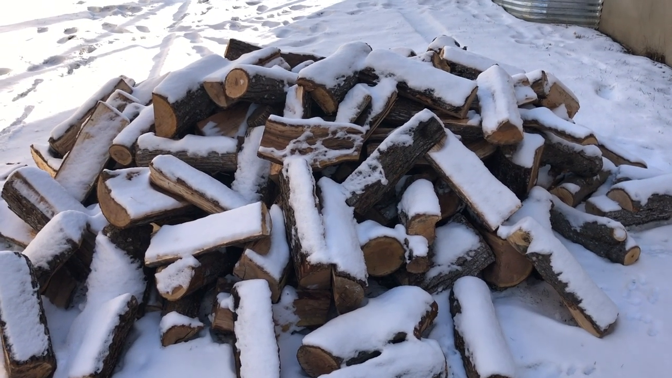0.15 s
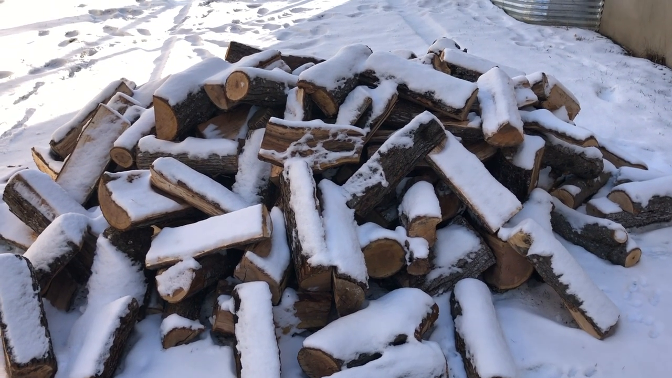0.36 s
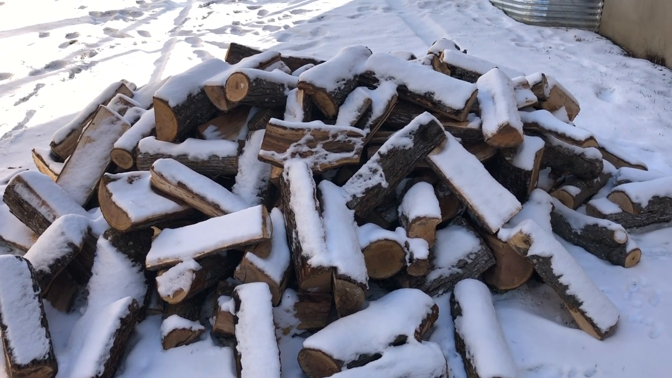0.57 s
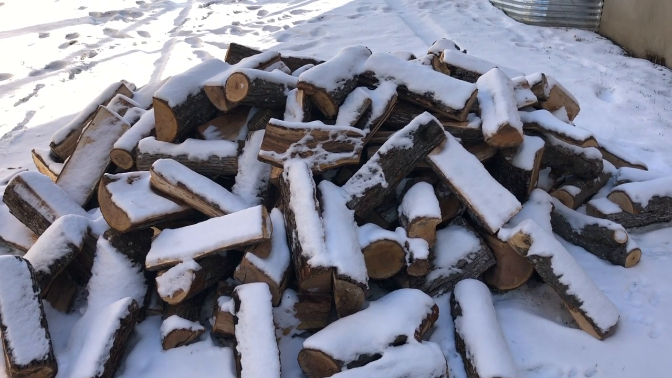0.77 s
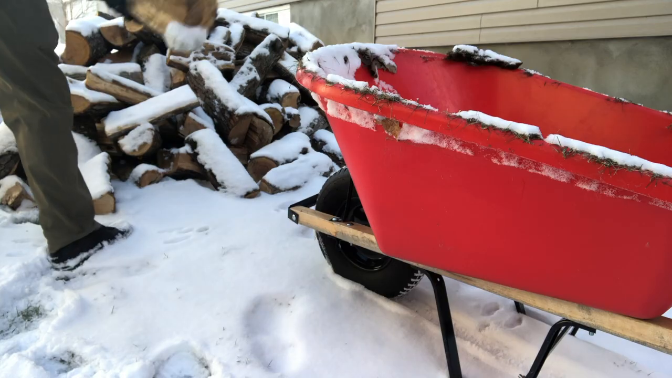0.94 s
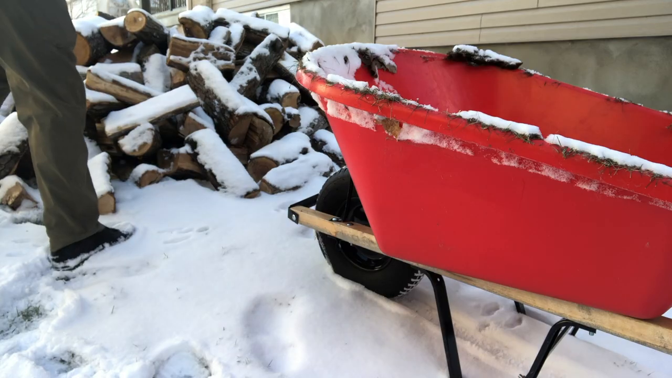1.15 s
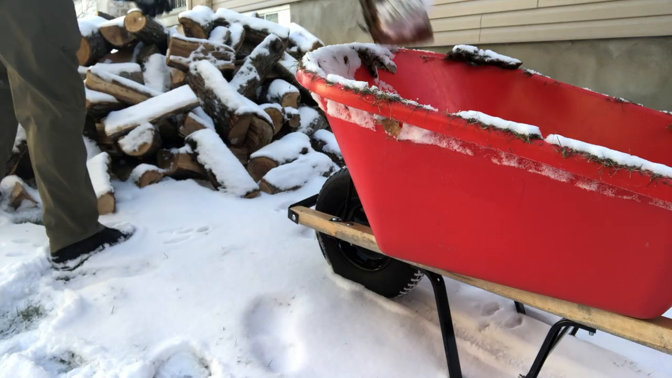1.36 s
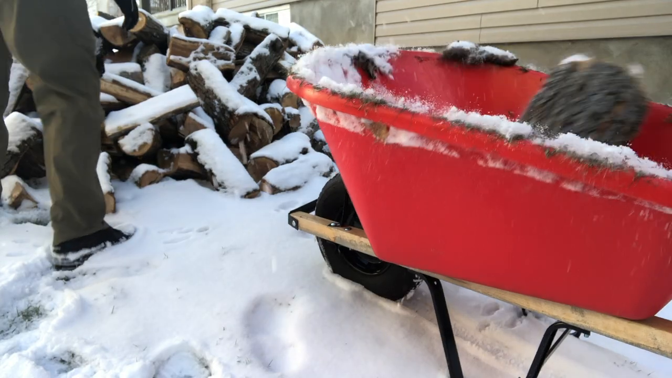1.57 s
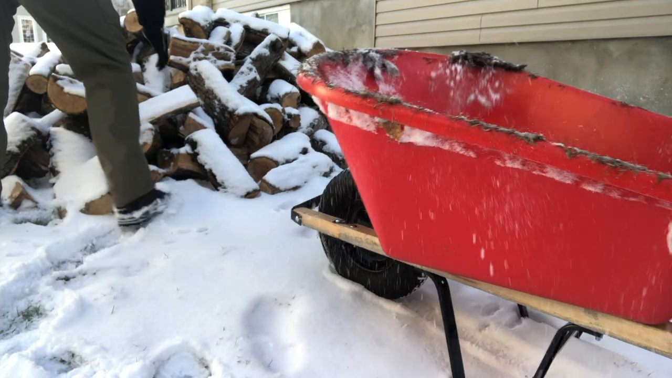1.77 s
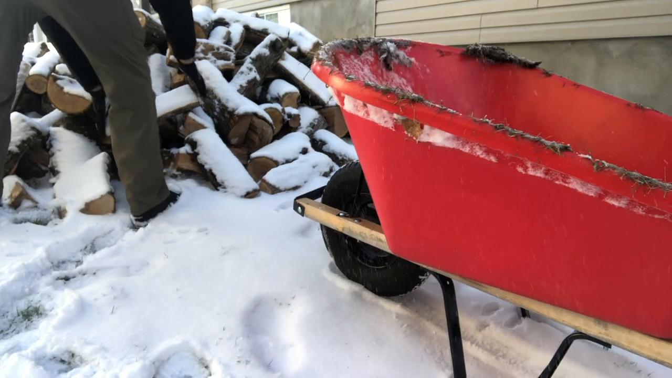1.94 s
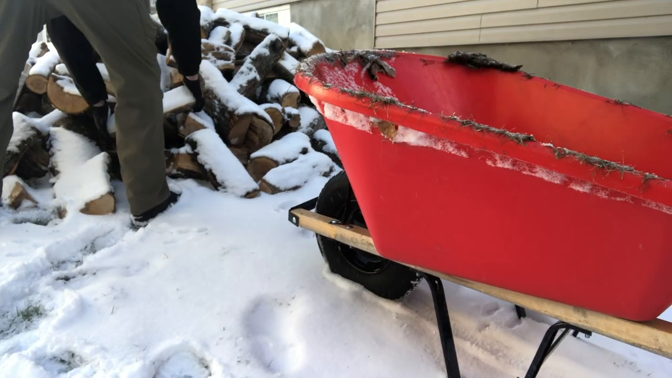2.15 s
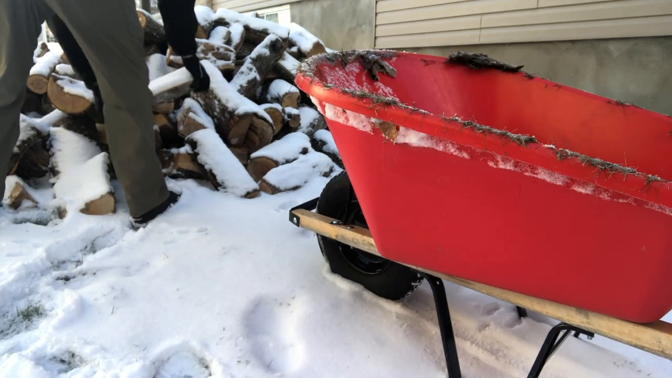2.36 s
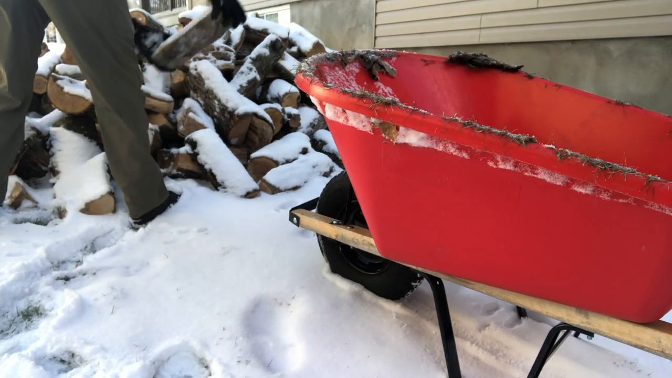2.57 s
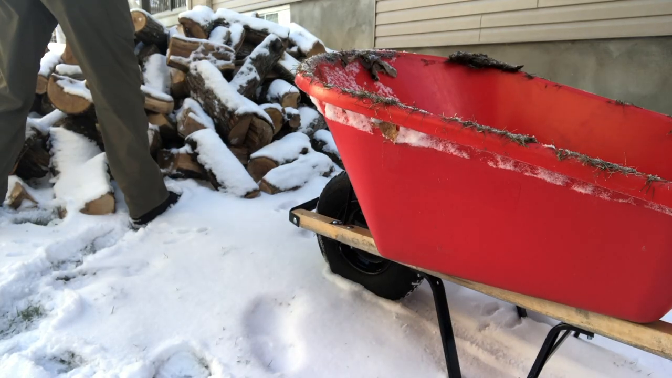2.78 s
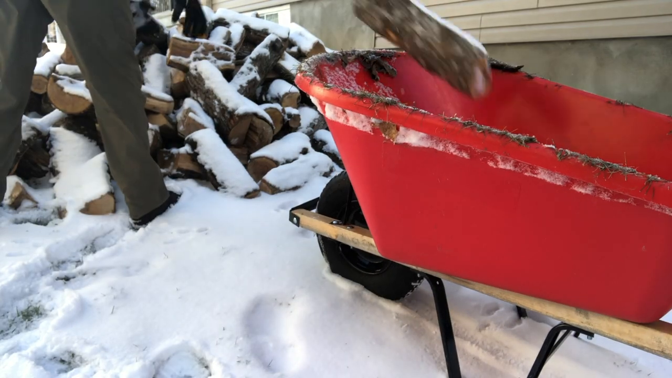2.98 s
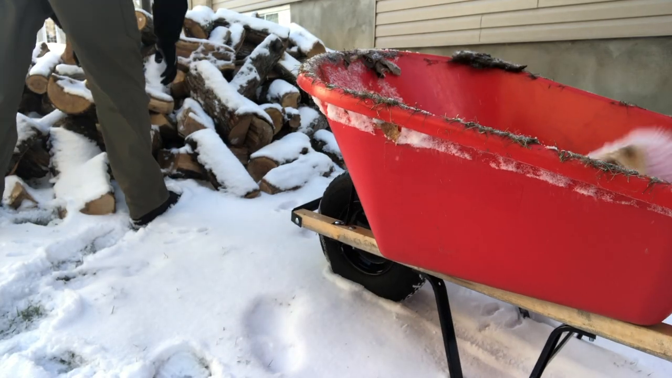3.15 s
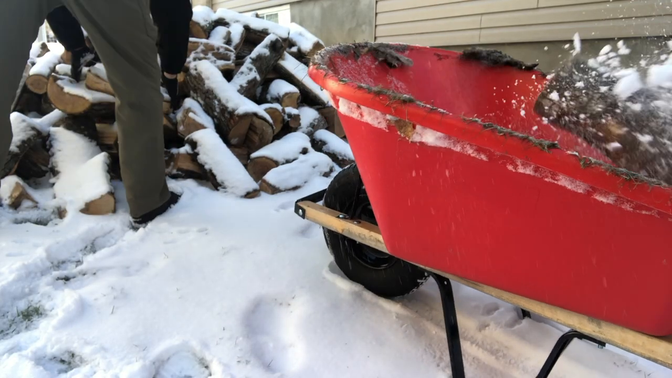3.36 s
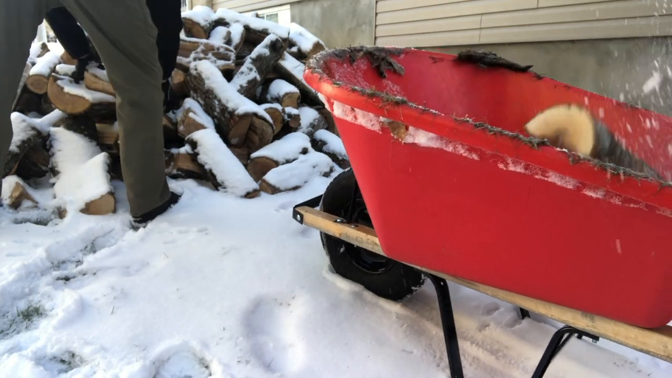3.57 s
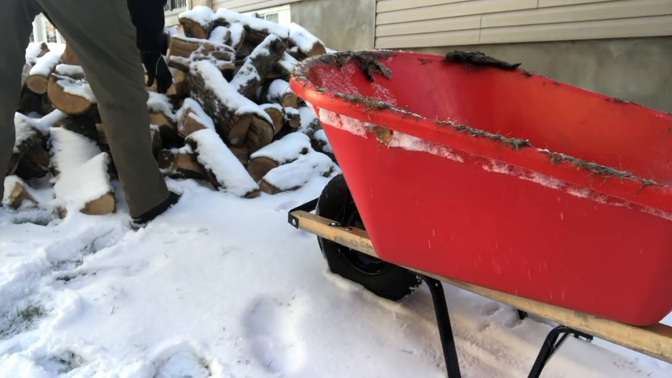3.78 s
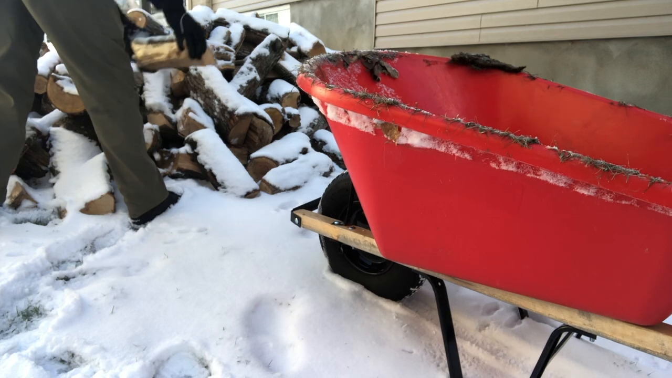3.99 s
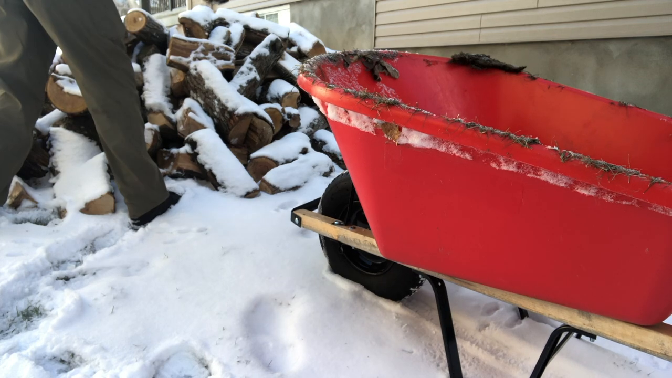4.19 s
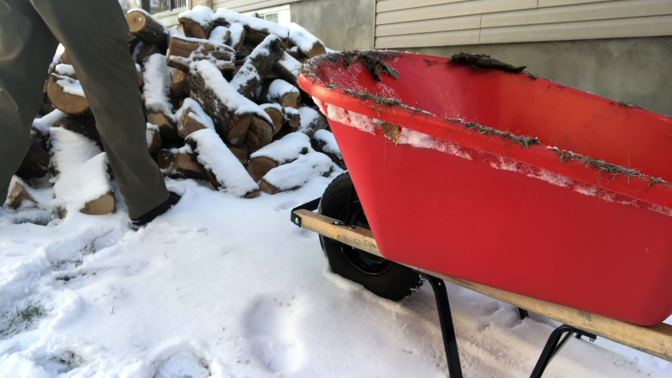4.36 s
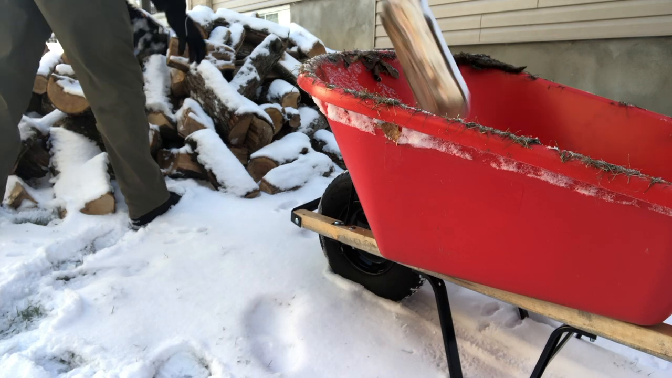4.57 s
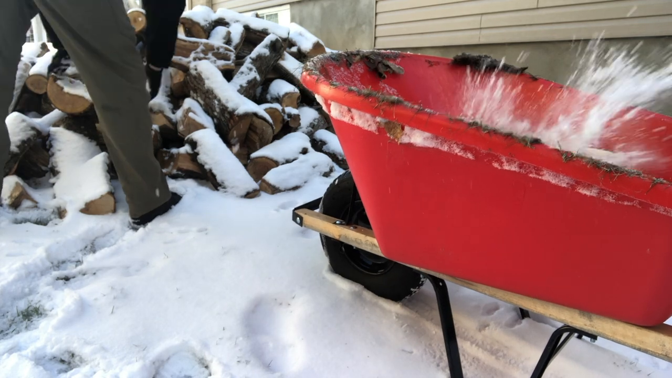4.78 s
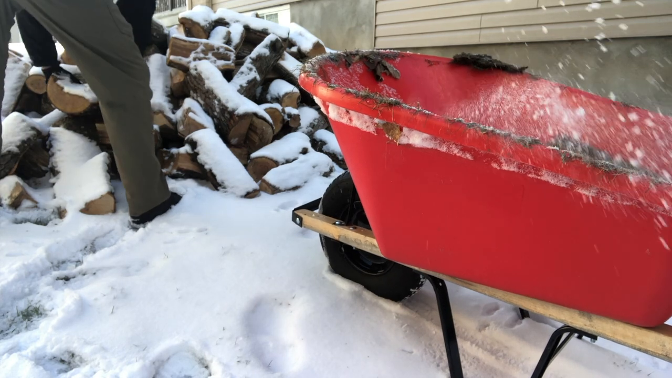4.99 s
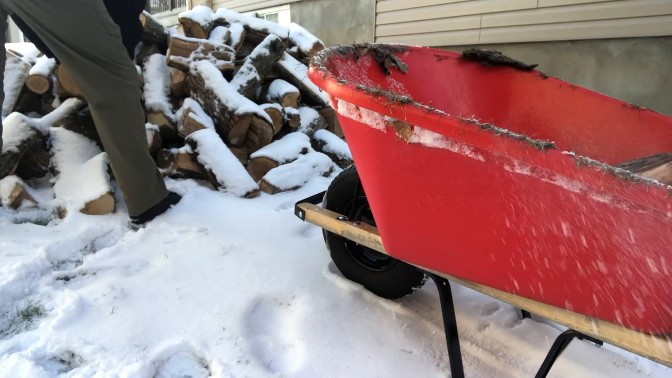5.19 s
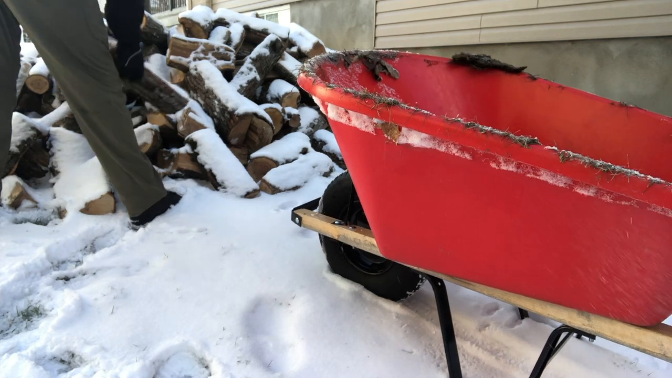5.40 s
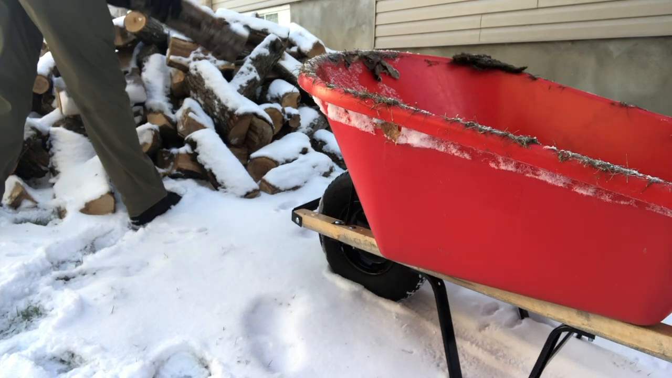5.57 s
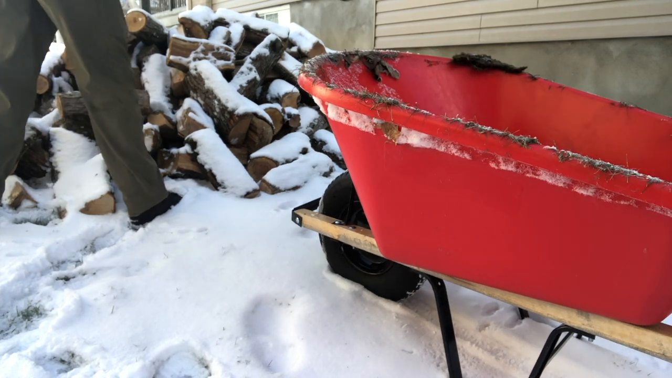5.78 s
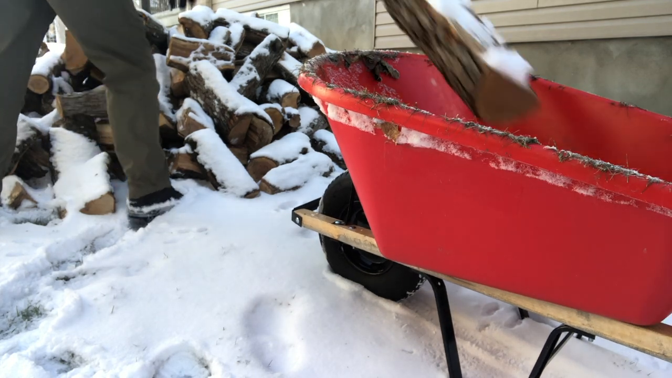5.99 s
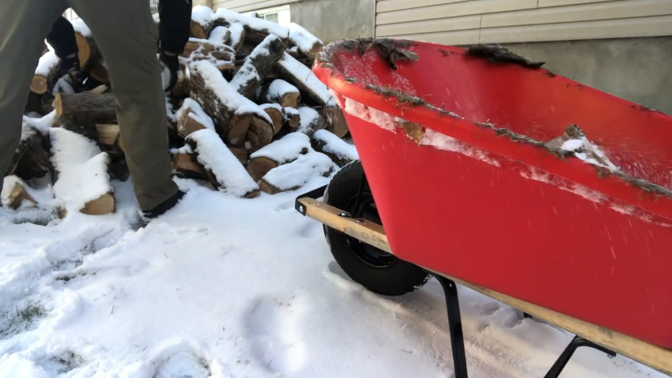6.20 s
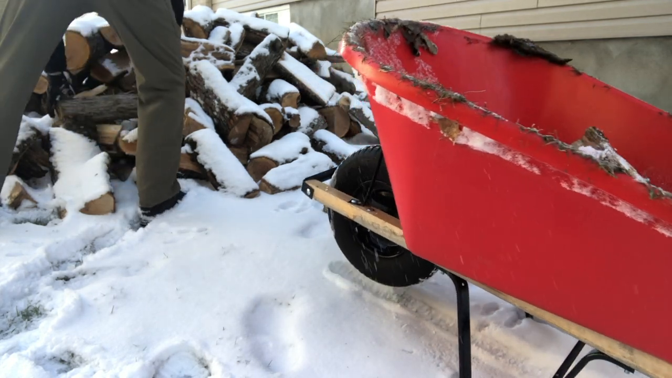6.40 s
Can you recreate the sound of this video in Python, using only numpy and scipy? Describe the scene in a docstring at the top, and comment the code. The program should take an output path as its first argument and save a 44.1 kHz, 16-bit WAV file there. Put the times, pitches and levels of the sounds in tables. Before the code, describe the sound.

In a quiet snowy yard, faint footfalls and a soft rustle lead to a split log slamming into an empty plastic wheelbarrow with a deep hollow boom. It tumbles, and the frame gives a low thump as it settles. Three more logs follow about a second and a half apart, cracking against wood and tub, rolling and knocking. Close microphone, dry, mono.

```python
"""A snowy yard beside a house wall, where four split logs are thrown into a plastic wheelbarrow.
Logs, tub and frame sound by filtered noise bursts and decaying modes: each log lands in a cluster
of blows, tumbles, rolls and knocks against the others while the tub booms. Soft thumps fall in
pitch, a pulled log rustles, crumbs tick down as noise grains, and a faint hiss swells over a hush.
The barrow rocks on its legs, and a limiter holds down the landings."""
import sys
import numpy as np
from scipy import signal
from scipy.fft import rfft, irfft
from scipy.io import wavfile
from scipy.ndimage import uniform_filter1d, minimum_filter1d, map_coordinates

SR = 44100
rng = np.random.default_rng(int(sys.argv[2]) if len(sys.argv) > 2 else 0)


def transcribe(u):
    """Save the signal u as a 16-bit wav file named by the first command-line argument.

    u: samples, shape (n,) or (channels, n), limited to [-1, 1]; the rate is SR.
    q: integer samples, one column per channel.
    """
    v = np.clip(np.atleast_2d(u).T, -1, 1)
    q = np.round(v * 32767).astype(np.int16)
    wavfile.write(sys.argv[1], SR, q)


N = 284004

# spectrum shared by the background hiss and the rustling: (frequency [Hz], relative level [dB])
HISS_SPECTRUM = [(30, -7.5), (100, -8), (280, 6), (450, -7), (750, 4), (1400, -11.5), (2700, -5.5),
                 (3800, -23), (4900, -18), (5050, -9.5), (5200, -24.5), (7000, -24.5), (10000, -37),
                 (15000, -36.5)]
# spectrum of splintering ice and falling crumbs: (frequency [Hz], relative level [dB])
ICE_SPECTRUM = [(3000, -24.5), (4500, -4.5), (6200, 2.5), (8000, -15.5), (10000, -9), (15000, -29)]
# Impacts; each part adds its own gain to the levels:
# (time [s], tub thud [dB], tub boom [dB], wood [dB], edge crack [dB], clatter length [s])
LANDING_IMPACTS = [(1.55, -15, -12.5, -19, -25, 0.05), (3.138, -14, -16, -21.5, -12, .11),
                   (4.683, -12, -25, -21, -40, 0.08), (6.118, -11, -20, -23, -19.5, 0.02)]  # a thrown log lands in the tub
KNOCK_IMPACTS = [(1.562, -6, -18, -25.5, -42, 0.0018), (1.709, -9, -22, -22.5, -46, .002),
                 (1.8163, -26, -22, -21, -20.5, 0.0087), (1.865, -18.5, -25, -28.5, -55, 0.0024),
                 (1.9797, -28.5, -42, -35, -27.5, 0.0018), (2.08, -46, -64, -48, -49, .001),
                 (2.151, -24.5, -32, -35.5, -33, 0.0089), (2.199, -31.5, -46, -45.5, -38, 0.0015),
                 (2.264, -40, -64, -40.5, -43.5, 0.0083), (2.367, -40, -58, -44, -63, 0.0032),
                 (2.498, -44, -57, -48.5, -63, 0.0037), (3.198, -11, -10.5, -17, -18, .002),
                 (3.237, -9, -18, -31, -18.5, .002), (3.258, -16, -24, -31, -45, .008),
                 (3.508, -17.5, -22.5, -28.5, -38, 0.0058), (3.611, -18.5, -17, -31, -34, 0.036),
                 (3.722, -21, -28, -27.5, -44, 0.022), (3.829, -20, -24, -25, -35.5, 0.026),
                 (3.866, -10, -39, -23, -31, 0.0098), (3.987, -34.5, -31, -40.5, -58, .002),
                 (4.042, -40, -37.5, -50.5, -41, 0.045), (4.11, -35.5, -47, -46, -55, 0.011),
                 (4.171, -59, -40.5, -51.5, -55, .002), (4.77, -26, -14.5, -27.5, -22, 0.014),
                 (4.826, -29, -25.5, -32, -42, 0.0015), (5.039, -16, -30, -26.5, -42, .03),
                 (5.085, -31, -46, -31.5, -33.5, .002), (5.16, -29.5, -31.5, -44.5, -57, .002),
                 (5.19, -19, -25, -36, -62, 0.0012), (5.296, -28.5, -41, -41.5, -52, 0.044),
                 (5.336, -21.5, -28, -37.5, -24.5, .004), (5.424, -30, -34, -37, -42, 0.0018),
                 (5.498, -40.5, -38.5, -49, -45, 0.041), (5.651, -41.5, -36.5, -51.5, -87, 0.0026),
                 (5.711, -43, -43, -48, -108, 0.0084), (6.153, -8.5, -30, -17.5, -47, 0.0022),
                 (6.185, -19, -20.5, -24, -21, .025), (6.344, -41, -44, -48, -49, 0.053),
                 (6.434, -43, -63, -35.5, -56, 0.0016)]  # a log tumbles against the tub or other logs


def gain_of(db):
    """Level to amplitude: 20 dB is a factor of ten."""
    return 10 ** (np.asarray(db) / 20)


def evened(x):
    """Normalises the mean power: scales to rms 1."""
    return x / np.sqrt(np.mean(x ** 2) + 1e-20)


def read(points, hz):
    """Interpolates a spectrum linearly in level over log frequency."""
    f, value = np.transpose(points)
    return np.interp(np.log(hz + 1), np.log(f), value)


def add(mix, s, sound):
    """Superposition: sums a sound into the mix at time s [s]."""
    part = mix[max(round(s * SR), 0):][:len(sound)]
    part += sound[:len(part)]


def coloured(points):
    """Spectral shaping: white noise weighted per frequency, then brought to rms 1."""
    spectrum = rfft(rng.standard_normal(N))
    gain = gain_of(read(points, np.fft.rfftfreq(N, 1 / SR)))
    return evened(irfft(spectrum * gain, N))


def response(points, size=4096):
    """Minimum phase: the Hilbert transform of log gain gives a causal impulse response of energy 1."""
    log_gain = np.log(gain_of(read(points, abs(np.fft.fftfreq(size, 1 / SR)))))
    minimum_phase = np.exp(np.conj(signal.hilbert(log_gain)))
    taps = np.fft.ifft(minimum_phase).real[:size // 2]
    return taps / np.linalg.norm(taps)


def background():
    """Amplitude-modulated noise: a steady coloured hush under a hiss that swells a little."""
    # the constant hush: (frequency [Hz], relative level [dB])
    hush_spectrum = [(25, -4.5), (70, -3.5), (150, -11.5), (330, -13.5), (750, -12.5), (1500, -23),
                     (2500, -33), (5000, -34), (10000, -40), (15000, -39.5)]
    hush_db, hiss_db, swell_db = -69.5, -70, 1.2
    hiss_start_s, hiss_rise_s = 0.82, 0.026
    t = np.arange(N) / SR
    rates_hz = np.geomspace(.5, 14, 20)
    swell = evened(sum(np.sin(2 * np.pi * (f * t + rng.random())) / np.sqrt(f) for f in rates_hz))
    # soft handling rustle makes the hiss 5 dB louder at first
    level_db = hiss_db + np.interp(t, (1.3, 2.3), [5, 0]) + swell_db * swell
    # the hiss rises from a twentieth to its full amplitude
    opening = np.clip((t - hiss_start_s) / hiss_rise_s, .05, 1)
    hush = gain_of(hush_db) * coloured(hush_spectrum)
    return hush + opening * gain_of(level_db) * coloured(HISS_SPECTRUM)


def ground(count=8):
    """Dispersion: soft thumps fall in pitch, as waves disperse in the frozen ground."""
    # dull thumps on the frozen ground:
    # (time [s], level [dB], starting pitch [Hz], length scale [s])
    ground_thumps = [(0.179, -47.5, 227, 0.069), (0.237, -48, 223, 0.076), (0.332, -52.5, 145, 0.11),
                     (0.502, -49.5, 196, 0.074), (0.532, -46.5, 287, 0.024), (0.547, -44.5, 151, 0.078),
                     (0.661, -52, 280, 0.064), (1.134, -51, 360, 0.038), (1.355, -44.5, 304, 0.038),
                     (2.209, -23, 258, 0.053), (2.519, -39, 252, 0.052), (5.705, -38, 327, 0.06)]
    shuffle_end_s, shuffle_db, shuffle_hz, shuffle_length_s = 0.68, -57.5, 128, 0.15
    final_hz, pitch_fall_s, crunch_gain = 55, 0.0252, 0.29
    out = np.zeros(N)
    # feet shift softly between the first steps
    starts = (np.arange(count) + rng.random(count)) * shuffle_end_s / count
    shuffles = [(s, shuffle_db, shuffle_hz, shuffle_length_s) for s in starts]
    t = np.arange(SR // 4) / SR
    for s, db, hz, length in ground_thumps + shuffles:
        turns = np.cumsum(final_hz + (hz - final_hz) * np.exp(-t / pitch_fall_s)) / SR
        low_pass = signal.butter(2, hz, fs=SR, output="sos")
        crunch = evened(signal.sosfilt(low_pass, rng.standard_normal(len(t))))
        age = t / (0.23 * length)  # the envelope peaks at age 1
        envelope = (age * np.exp(1 - age)) ** 2
        add(out, s, gain_of(db) * envelope * (np.sin(2 * np.pi * turns) + crunch_gain * crunch))
    return out


def rustle():
    """Friction noise: short Gaussian swells of snow and cloth rubbing."""
    # a log is pulled from the snowy pile: (time [s], level [dB])
    pulls = [(.9, -62), (1.075, -61.5), (1.16, -64), (1.225, -69), (1.38, -68)]
    width_s = .025
    t = np.arange(N) / SR
    envelope = sum(gain_of(db) * np.exp(-((t - s) / width_s) ** 2) for s, db in pulls)
    return coloured(HISS_SPECTRUM) * envelope


def struck(blows, colour, db, delay, t60, rise, tail_db, tail_t60, grain, push, size=20000, count=4000):
    """Impulse excitation: a push, a quick scatter of waves, then a grainy rattling tail."""
    t, taps, out = np.arange(size) / SR, response(colour), np.zeros(N)
    dying = gain_of(-60 * t / tail_t60) * (1 - np.exp(-t / t60))
    early = t[:count]
    for s, level_db, soft in blows:
        lumps = np.repeat(rng.standard_normal(size // 150 + 1), 150)[:size]
        scatter = rng.standard_normal(size) * np.exp(grain * lumps)
        # a soft contact stretches both rise and decay
        envelope = gain_of(-60 * early / (t60 * soft)) * (1 - np.exp(-early / (rise * soft)))
        burst = scatter[:count] * envelope
        burst[0] += push * np.linalg.norm(burst)
        burst /= np.linalg.norm(signal.fftconvolve(burst, taps))
        tail = scatter * dying
        add(out, s + delay, gain_of(level_db + db) * burst)
        add(out, s + delay, gain_of(level_db + db + tail_db) * tail / np.linalg.norm(tail))
    return signal.oaconvolve(out, taps)[:N]


def ring(modes, hits, spread_db, rise, detune, size=50000):
    """Modal decay: hits ring the modes; strengths and any detuning vary with spot and piece struck."""
    hz, mode_db, t60 = np.transpose(modes)
    t, out = np.arange(min(size, int(1.2 * t60.max() * SR))) / SR, np.zeros(N)
    decay = gain_of(mode_db[:, None] - 60 * t / t60[:, None])
    waves = decay * np.sin(2 * np.pi * hz[:, None] * t)
    waves *= 1 - np.exp(-t / rise)
    for s, db in hits:
        sound = gain_of(db + spread_db * rng.standard_normal(len(modes))) @ waves
        if detune:
            stretch = np.exp(detune * rng.standard_normal())
            sound = map_coordinates(sound, [np.arange(len(t)) * stretch], order=3)
        add(out, s, sound)
    return out


def clatter(impacts, fall_db_per_s, count):
    """Repeated rebound: uneven blows hold their strength, then die.

    Rows: (time [s], thud [dB], boom [dB], wood [dB], clack [dB])."""
    rebound_s, jitter, spread_db = .017, .25, 3
    clack_over_wood_db = -1.5  # the bark
    clack_per_crack = 0.16  # harder edges clatter brighter (dB per dB of crack over wood)
    blows = []
    for s, thud_db, boom_db, wood_db, crack_db, length in impacts:
        gaps = rebound_s * np.exp(jitter * rng.standard_normal(count))
        ages = np.cumsum(gaps) - gaps[0]
        fade_db = -fall_db_per_s * np.maximum(ages - length, 0)
        # the first blow has no random spread
        luck_db = spread_db * rng.standard_normal((count, 4)) * (ages > 0)[:, None]
        clack_db = wood_db + clack_over_wood_db + clack_per_crack * (crack_db - wood_db)
        levels_db = np.array([thud_db, boom_db, wood_db, clack_db]) + fade_db[:, None] + luck_db
        blows.append(np.column_stack([s + ages, levels_db]))
    return np.vstack(blows)


def rolling(count=14):
    """Rolling as serial impact: small uneven bumps weaken as the log comes to rest; rows as in clatter."""
    # between knocks a log rolls and rubs in the tub:
    # (start [s], end [s], thud level at the start [dB], thud level at the end [dB])
    rolls = [(1.662, 1.952, -32, -49.5), (3.521, 4.198, -24.5, -47.5), (4.901, 5.621, -40, -48.5)]
    over_thud_db = [0, -6, -6, -6]  # thud, boom, wood, clack
    spread_db = 2.5
    blows = []
    for start, end, first_db, last_db in rolls:
        way = (np.arange(count) + rng.random(count)) / count
        path_db = first_db + (last_db - first_db) * way
        bump_db = path_db[:, None] + spread_db * rng.standard_normal((count, 4))
        blows.append(np.column_stack([start + (end - start) * way, bump_db + over_thud_db]))
    return np.vstack(blows)


def logs():
    """Dispersion: the wood cracks first; slow bending waves of the tub follow milliseconds later."""
    # spectra of the parts of a blow, from bright to deep: (frequency [Hz], relative level [dB])
    clack_spectrum = [(700, -36.5), (1500, -9), (2300, 0), (2800, -3.5), (3200, -12.5), (3600, -25),
                      (4400, -36), (6300, -37.5), (9000, -46.5), (15000, -80)]
    knock_spectrum = [(300, -46.5), (560, 3), (760, 1), (1050, -1), (1400, -8.5), (1900, -23), (3200, -63),
                      (8000, -110)]
    thud_spectrum = [(130, -41.5), (230, -8.5), (315, -2), (380, 2), (470, -1), (620, -12.5), (900, -34.5),
                     (1500, -75.5), (5000, -120)]
    boom_spectrum = [(20, -35.5), (55, -8), (105, 2.5), (140, -2.5), (185, 4), (260, -8.5), (450, -41.5),
                     (900, -71.5), (4000, -120)]
    # modes of the plastic tub, of split wood and of the struck tub wall, the last two
    # before detuning: (frequency [Hz], relative level [dB], decay time t60 [s])
    tub_modes = [(102, -11, .6), (172, -17, .45), (184, -15, .35), (242, -17, .4), (291, -16, .4),
                 (328, -9, .25), (380, -6, .28), (394, -14, .4), (466, -13, .22), (646, -24, .28),
                 (808, -22, .24), (940, -25, .28)]
    wood_modes = [(810, -4, .11), (945, -4, .1), (1060, -5, .08), (1296, -4, .08), (1655, -7, .06),
                  (1820, -5, .06), (1925, -4, .06), (2099, -3, .05), (2343, 0, .06), (2540, -2, .05),
                  (2739, -1, .06)]
    wall_modes = [(363.6, -0.5, 0.084), (187, -4.5, .07)]
    # after the clatter, rebounds weaken by so many dB per second
    landings = clatter(LANDING_IMPACTS, fall_db_per_s=160, count=16)
    knocks = clatter(KNOCK_IMPACTS, fall_db_per_s=800, count=4)
    s, thud_db, boom_db, wood_db, clack_db = np.vstack([landings, knocks, rolling()]).T
    knock_db = wood_db + 2  # the body of the log
    # snow and loose bark prolong the contact
    softness = np.clip(gain_of(0.088 * (thud_db - clack_db)), .5, 1.5)
    clack = struck(zip(s, clack_db, softness), clack_spectrum, db=20.0, delay=.0002, t60=0.029,
                   rise=0.0066, tail_db=-7.5, tail_t60=0.37, grain=0.44, push=0.056)
    knock = struck(zip(s, knock_db, softness), knock_spectrum, db=22.5, delay=0.00058, t60=0.067,
                   rise=0.0045, tail_db=-10, tail_t60=0.41, grain=0.64, push=0.52)
    thud = struck(zip(s, thud_db, softness), thud_spectrum, db=21.0, delay=.003, t60=0.076,
                  rise=.0005, tail_db=-11.5, tail_t60=0.44, grain=0.4, push=0.49)
    boom = struck(zip(s, boom_db, softness), boom_spectrum, db=17.5, delay=0.004, t60=0.021,
                  rise=0.0012, tail_db=-5.5, tail_t60=0.53, grain=.3, push=0.9)
    tub = ring(tub_modes, zip(s, thud_db), spread_db=4.0, rise=0.0088, detune=0)
    wood = ring(wood_modes, zip(s, (knock_db + clack_db) / 2), spread_db=3.5, rise=0.0023, detune=0.037)
    wall = ring(wall_modes, zip(s + .003, thud_db), spread_db=0.5, rise=0.004, detune=.07)
    ringing = gain_of(-2.5) * wall + gain_of(-13.5) * tub + gain_of(-5.5) * wood
    return clack + knock + thud + boom + ringing


def snap(hits, colour, db, decay, size=1500):
    """Brittle fracture: a few milliseconds of crushing noise where hard edges meet."""
    age, out = np.arange(size) / SR / decay, np.zeros(N)
    for s, level_db in hits:
        envelope = age * np.exp(1 - age)
        add(out, s, gain_of(level_db + db) * envelope * rng.standard_normal(size))
    return signal.oaconvolve(out, response(colour))[:N]


def edges():
    """Contact fracture: each first contact cracks; ice splinters mostly under the hardest cracks."""
    # spectrum of cracking edges: (frequency [Hz], relative level [dB])
    crack_spectrum = [(300, -16), (900, -7), (1600, -6), (2300, 4), (2900, -1), (3300, -13), (3900, -39),
                      (5000, -45), (8000, -55.5), (15000, -82.5)]
    s, _, _, _, crack_db, _ = np.transpose(LANDING_IMPACTS + KNOCK_IMPACTS)
    ice_db = -23 + 1.9 * crack_db  # grows 1.9 dB per dB of crack
    cracks = snap(zip(s, crack_db), crack_spectrum, db=4.0, decay=0.00049)
    return cracks + snap(zip(s, ice_db), ICE_SPECTRUM, db=1, decay=0.0024)


def spatter(per_s=900, fade=0.02, spread_db=3):
    """Thinning random arrivals: crumbs shaken loose by an impact tick down."""
    over_wood_db = -30
    t, out = np.arange(SR // 4) / SR, np.zeros(N)
    left = np.exp(-t / fade)  # the last crumbs are both fewer and smaller
    for s, _, _, wood_db, _, _ in LANDING_IMPACTS + KNOCK_IMPACTS:
        falls = rng.random(len(t)) < per_s * left / SR
        luck_db = spread_db * np.minimum(rng.exponential(1, len(t)), 3)
        add(out, s, falls * np.sqrt(left) * gain_of(wood_db + over_wood_db + luck_db))
    tick = rng.standard_normal(400) * np.exp(-np.arange(400) / 90)
    tick /= np.linalg.norm(tick)
    return signal.oaconvolve(out, np.convolve(response(ICE_SPECTRUM), tick))[:N]


def barrow():
    """Modal resonance: the frame rings as the barrow settles on its legs."""
    # rocks onto the legs: (time [s], level [dB])
    leg_rocks = [(2.244, -27), (2.548, -35.5)]
    # modes of the frame: (frequency [Hz], relative level [dB], decay time t60 [s])
    frame_modes = [(64, 1.5, .22), (70.4, -3, 0.72), (198.6, -19, 0.6), (195, -30, 1.1)]
    return ring(frame_modes, leg_rocks, spread_db=4.5, rise=0.004, detune=0)


def scene():
    """Linear superposition of background, ground, logs and barrow in one channel."""
    return (background() + ground() + rustle() + logs() + edges() + spatter() + barrow())[None]


def record(dry, size=260):
    """Gain reduction and band limiting: a fast peak limiter, then a low-pass."""
    ceiling_db, edge_hz = -6.7, 15700
    allowed = np.minimum(1, gain_of(ceiling_db) / (abs(dry) + 1e-9))
    limited = dry * uniform_filter1d(minimum_filter1d(allowed, size), size)
    low_pass = signal.firwin(511, edge_hz, window=("kaiser", 9), fs=SR)
    return signal.oaconvolve(limited, low_pass[None], "same")


dry = scene()
out = record(dry)
transcribe(out)
```